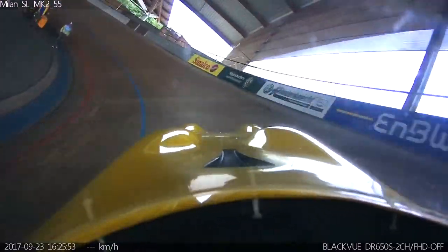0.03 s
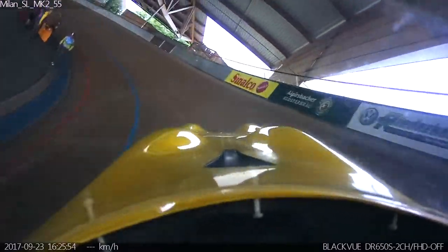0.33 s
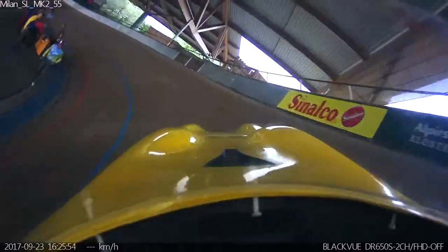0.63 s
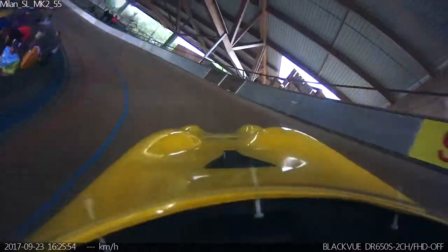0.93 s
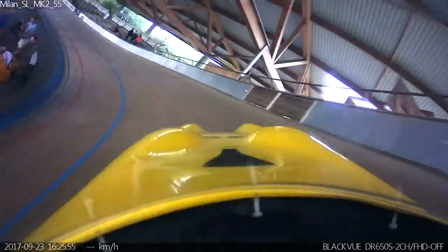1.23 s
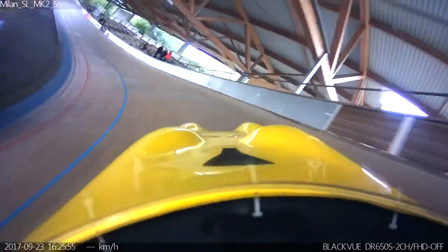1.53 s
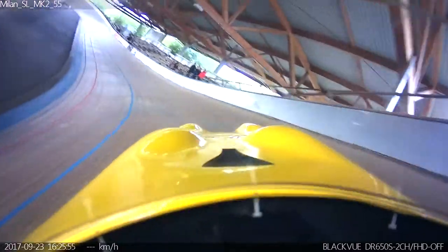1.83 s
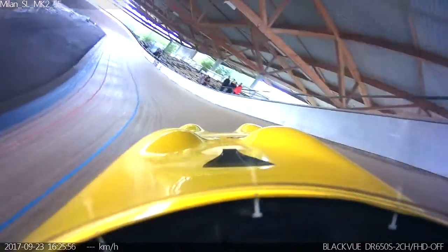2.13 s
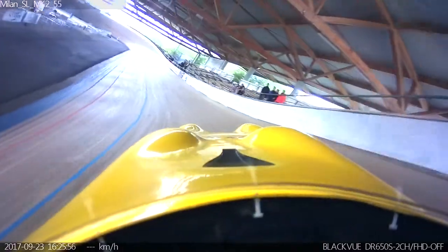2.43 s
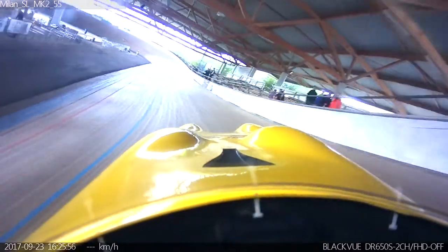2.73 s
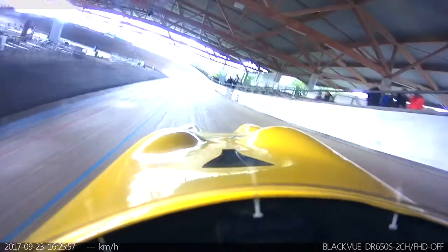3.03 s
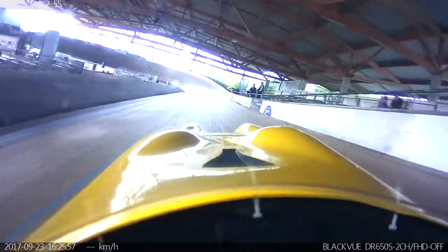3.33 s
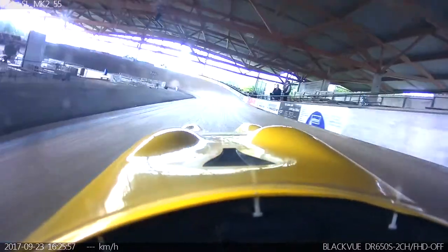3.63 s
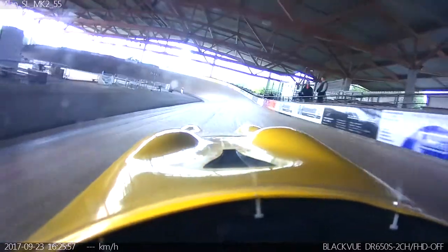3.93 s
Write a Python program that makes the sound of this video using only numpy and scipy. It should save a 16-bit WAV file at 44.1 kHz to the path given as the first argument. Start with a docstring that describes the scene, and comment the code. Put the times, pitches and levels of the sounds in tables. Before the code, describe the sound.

A pedal vehicle rolls fast along a wooden track with a deep, hollow rumble.

```python
"""A velomobile rolls fast along a wooden indoor track, heard from its shell.
Throughout, the body shakes and jolts with a deep rumble and the tyres roar through the hollow shell;
bumps thud, loose parts tick faintly. The cabin booms in the banked turn, fading after 1.4 s.
At 1.5 s and 2.7 s the thin hiss of tyres and air swells into a swish.
From 3.6 s, on the straight, a brighter band grows in the roar."""
import sys
import numpy as np
from scipy import signal
from scipy.fft import rfft, irfft, next_fast_len
from scipy.io import wavfile
from scipy.ndimage import uniform_filter1d, map_coordinates

SR = 44100
rng = np.random.default_rng(int(sys.argv[2]) if len(sys.argv) > 2 else 0)


def store_wav(level_fs):
    """Save 16-bit WAV to argv[1]."""
    pcm = np.round(np.clip(np.atleast_2d(level_fs), -1, 1) * 32767)
    wavfile.write(sys.argv[1], SR, pcm.T.astype(np.int16))


N = 176400

# envelopes of the hiss, its rasp band and its top band: t/s, relative level/dB
HISS_DB = [(0, -52), (.3, -46.5), (.55, -49.5), (.7, -50.5), (.95, -47.5), (1.34, -52), (1.7, -48),
           (2.05, -53), (2.22, -48.5), (2.48, -52.5), (2.7, -53), (3.19, -55), (3.28, -60), (3.42, -48),
           (3.7, -53.5), (3.85, -53), (3.93, -55.5)]
RASP_DB = [(0, -57.5), (.3, -52.5), (.7, -62.5), (.86, -60.5), (.98, -50), (1.15, -58), (1.9, -60),
           (2.2, -54), (2.55, -64), (2.7, -57.5), (2.78, -49.5), (2.92, -48), (3.03, -53.5), (3.28, -62),
           (3.55, -54.5), (3.85, -58.5), (3.92, -67)]
FIZZ_DB = [(0, -68), (1.2, -69.5), (3.5, -69), (3.8, -64.5), (4, -64)]
# air over the shell: start/s, rise/s, release delay from start/s, release time constant/s, level/dB
SWISHES = [(1.464, 0.098, 0.07, 0.033, -37.5), (2.715, 0.05, .27, 0.32, -46.5)]
# impacts of loose parts: t/s, level/dB
TICKS = [(0.118, -31.5), (.444, -35), (0.793, -27), (1.1403, -31.5), (1.8296, -30.5), (1.835, -34.5),
         (2.2383, -35), (2.5767, -29), (3.166, -34.5), (3.186, -28.5), (3.422, -34), (3.5552, -26.5),
         (3.8042, -31.5)]
# modes of a loose part: f/Hz, level/dB, t60/s
TICK_MODES = [(2266, -10.5, 0.015), (2760, -3, 0.0074), (3600, -7.5, 0.0053), (4220, -7, 0.004),
              (5330, -12, 0.0076)]
# track bumps: t/s, level/dB, Gaussian sigma/s
BUMPS = [(0.081, -27.5, 0.01), (0.335, -32.5, 0.025), (0.916, -27, 0.039), (1.241, -27.5, 0.047),
         (1.558, -26.5, 0.035), (1.841, -24.5, 0.012), (1.974, -20.5, 0.013), (2.629, -27.5, 0.015),
         (3.173, -25, .022), (3.432, -28, 0.021), (3.673, -23, 0.0059), (3.836, -24, 0.017),
         (4, -41.5, 0.045)]
# knocks on a shell panel: t/s, level/dB
PANEL_KNOCKS = [(.775, -29.5), (1.95, -30), (3.038, -28), (3.16, -29)]
# envelopes of cabin boom, tyre roar, its bright band and body shake: t/s, relative level/dB
BOOM_DB = [(0, -30.5), (.7, -28), (1.4, -29.5), (2.2, -43), (4, -37.5)]
ROAR_DB = [(0, -27.5), (.9, -27), (1.1, -28.5), (1.4, -28.5), (2.0, -28), (2.45, -30.5), (2.7, -29.5),
           (2.88, -28.5), (3.1, -28.5), (3.3, -29), (3.6, -29.5), (4, -29)]
BRIGHT_DB = [(0, -50.5), (3.55, -51.5), (3.75, -48), (4, -31.5)]
SHAKE_DB = [(.1, -11), (.42, -15), (.6, -11), (.85, -13.5), (1.05, -11), (1.3, -16.5), (1.42, -12),
            (1.72, -16), (1.92, -14), (2.3, -11.5), (2.6, -21.5), (2.75, -15.5), (2.88, -11.5),
            (3.09, -20.5), (3.22, -12), (3.36, -10), (3.59, -14.5), (3.9, -10.5)]
# shell and cabin resonances: f/Hz, width/Hz, level/dB
SHELL_MODES = [(68.8, 9.7, -21), (272.2, 6.7, -35), (535, 18, -39.5), (1366, 41, -48)]
# hard jolts through the suspension: t/s, level/dB
JOLTS = [(0.038, -10.5), (0.572, -5.5), (0.684, -3.5), (0.75, -4.5), (0.955, -6.5), (1.086, -2.5),
         (1.14, -1.5), (1.566, -1.5), (1.834, -5.5), (1.916, 0), (2.686, -5.5), (2.847, -14), (3.215, -3.5),
         (3.575, 0), (3.727, -10), (3.859, -8.5)]
# noise spectra: f/Hz, relative density/dB
HISS_SPECTRUM = [(700, -9), (1500, 8), (2120, 6.5), (2400, 2), (2800, 0.5), (3120, -1.5), (3330, -4.5),
                 (4500, -5.5), (5500, -5.5), (5900, -10.5), (6550, -12), (7300, -35.5)]
SWISH_SPECTRUM = [(900, -5.5), (1400, 5), (1750, -1), (2200, 6.5), (2900, -5.5), (3400, -4.5), (4500, -4.5),
                  (5500, -6), (6200, -13), (7400, -16)]
TICK_SPECTRUM = [(600, -18), (1800, 0.5), (3200, 2.5), (5400, 1), (6200, -9), (7300, -13)]
THUD_SPECTRUM = [(100, -14), (300, 9), (550, -1), (870, -1), (1150, -14), (1500, -26.5), (2200, -35),
                 (6000, -48.5)]
ROAR_SPECTRUM = [(60, -3), (110, 4), (145, 7), (200, 0), (245, 3), (320, -2.5), (420, -3.5), (620, -8.5),
                 (820, -11.5), (1000, -15.5), (1180, -21.5), (1500, -20.5), (1800, -36), (3000, -40.5),
                 (7000, -64)]
RUMBLE_SPECTRUM = [(4, -10), (15, 4.5), (25, 2), (31, 4.5), (39, -5), (52, 1.5), (65, 1.5), (80, -9),
                   (95, -7.5), (115, -22.5), (200, -71.5)]

TIME_S = np.arange(N) / SR
N_FFT = next_fast_len(N + 8192)
FREQ_HZ = np.fft.rfftfreq(N_FFT, 1 / SR)


def amp(db):
    """Decibels to gain."""
    return 10 ** (np.asarray(db) / 20)


def unit(x):
    """Scale to rms 1."""
    return x / np.sqrt(np.mean(x ** 2) + 1e-20)


def curve(rows):
    """Linear interpolation of (t/s, value) rows."""
    return np.interp(TIME_S, *np.transpose(rows))


def wobble(knots_per_s):
    """Smooth random curve, rms near 1."""
    return map_coordinates(rng.standard_normal(2000), [TIME_S * knots_per_s + 3], mode="wrap")


def noise(response):
    """Noise of rms 1, shaped by a response over FREQ_HZ."""
    return unit(irfft(rfft(rng.standard_normal(N_FFT)) * response, N_FFT)[:N])


def coloured(spectrum):
    """Noise with an (f/Hz, level/dB) spectrum."""
    hz, db = np.transpose(spectrum)
    return noise(amp(np.interp(np.log(FREQ_HZ + 1), np.log(hz + 1), db)))


def resonance(hz, width_hz):
    """Noise-driven resonance; two band-passes in series for steep skirts."""
    damping = 2j * FREQ_HZ * width_hz
    return noise((damping / (hz ** 2 - FREQ_HZ ** 2 + damping)) ** 2)


def patchy(x, depth_db=0.78):
    """Random drift of colour from moment to moment; rms 1."""
    spectra = signal.stft(x, nperseg=2048)[2]
    drift = uniform_filter1d(rng.standard_normal(spectra.shape), size=5, axis=0)
    drift = unit(uniform_filter1d(drift, size=6, axis=1))
    return unit(signal.istft(spectra * amp(depth_db * drift), nperseg=2048)[1][:N])


def decay(t, t60_s):
    """Exponential fall, 60 dB in t60_s."""
    return np.exp(-np.log(1000) * t / t60_s)


def strikes(rows, attack_s, t60_s):
    """Envelope of (t/s, level/dB) blows: fast rise, exponential fall."""
    envelope, t = np.zeros(N + SR), TIME_S[:SR // 4]
    shape = (1 - np.exp(-t / attack_s)) * decay(t, t60_s)
    for start_s, db in rows:
        envelope[int(start_s * SR):][:len(t)] += amp(db) * shape
    return envelope[:N]


def hiss():
    """Grainy hiss of tyres and air, with two narrow bands and swishes over the shell."""
    steady = amp(curve(HISS_DB) + 2) * patchy(coloured(HISS_SPECTRUM))
    swell = np.zeros(N)
    for start_s, rise_s, delay_s, release_s, db in SWISHES:
        t = TIME_S - start_s
        swell += amp(db) * np.clip(t / rise_s, 0, 1) * np.exp(-np.maximum(t - delay_s, 0) / release_s)
    swish = swell * patchy(coloured(SWISH_SPECTRUM))
    rasp = amp(curve(RASP_DB)) * resonance(hz=2855, width_hz=260)
    fizz = amp(curve(FIZZ_DB)) * resonance(hz=7020, width_hz=280)
    grain = amp(1.3 * wobble(160) + .5 * wobble(10))
    return grain * (steady + swish + rasp + fizz)


def loose_parts(rebound_db=-6, tail_db=-15, tiny_ticks_per_s=29):
    """Loose parts hit the shell, ring and rebound, over a sprinkle of tiny ticks."""
    snaps, t = np.zeros(N + SR), TIME_S[:SR // 20]
    for start_s, db in TICKS:
        ring = np.zeros(len(t))
        for hz, mode_db, t60_s in TICK_MODES:
            gain = amp(mode_db + rng.normal(0, 1.5))
            detuned_hz = hz * rng.normal(1, .03)
            ring += gain * decay(t, t60_s) * np.sin(2 * np.pi * detuned_hz * t)
        rebound_s = start_s + 0.003 * rng.uniform(.7, 1.3)
        snaps[int(start_s * SR):][:len(t)] += amp(db) * ring
        snaps[int(rebound_s * SR):][:len(t)] += amp(db + rebound_db) * ring
    draws = rng.random((int(tiny_ticks_per_s * N / SR), 2))
    tiny = [(when * N / SR, -38.5 - 0.5 * np.log(max(softness, .05))) for when, softness in draws]
    tails = strikes(list(TICKS) + tiny, attack_s=0.0001, t60_s=0.023)
    return snaps[:N] + amp(tail_db) * tails * coloured(TICK_SPECTRUM)


def bumps():
    """Uneven boards thud softly and knock a shell panel."""
    swell = sum(amp(db) * np.exp(-.5 * ((TIME_S - at_s) / sigma_s) ** 2) for at_s, db, sigma_s in BUMPS)
    panel = strikes(PANEL_KNOCKS, attack_s=0.0039, t60_s=0.083) * resonance(hz=1352, width_hz=250)
    return swell * coloured(THUD_SPECTRUM) + panel


def cabin_boom(hz=178.2, wander_hz=3.5, swing_db=2.5):
    """Wavering cabin tone, strongest in the banked turn."""
    phase = 2 * np.pi * np.cumsum(hz + wander_hz * wobble(14)) / SR
    return amp(curve(BOOM_DB)) * unit(amp(swing_db * wobble(12)) * np.sin(phase))


def tyre_roar():
    """Tyres on uneven boards drive the shell and its resonances with a fluttering roar."""
    drive_db = curve(ROAR_DB)
    flutter = amp(0.81 * wobble(18) + 1.3 * wobble(50))
    roar = amp(drive_db + 5.5) * patchy(coloured(ROAR_SPECTRUM))
    ring = sum(amp(db) * resonance(hz, width_hz) for hz, width_hz, db in SHELL_MODES)
    ring *= amp(.5 * (drive_db - drive_db.mean()))
    bright = amp(curve(BRIGHT_DB)) * resonance(hz=845, width_hz=52)
    return flutter * (roar + ring + bright)


def body_rumble(heave_hz=31.6, rise_s=0.01, highpass_hz=15):
    """The body judders on its suspension; each hard jolt adds one damped heave."""
    judder = unit(amp(-1.2 * wobble(20)) * coloured(RUMBLE_SPECTRUM))
    heaves = np.zeros(N)
    for start_s, db in JOLTS:
        t = np.maximum(TIME_S - start_s, 0)
        envelope = t / rise_s * np.exp(1 - t / rise_s)
        heaves += amp(db) * envelope * np.sin(2 * np.pi * heave_hz * t)
    highpass = signal.butter(1, highpass_hz, "highpass", fs=SR, output="sos")
    return amp(curve(SHAKE_DB) + 0.5) * judder + signal.sosfilt(highpass, heaves)


def scene():
    """Mono sum at the shell."""
    return (body_rumble() + tyre_roar() + cabin_boom() + bumps() + hiss() + loose_parts())[None]


def record(dry, knee_order=14, cutoff_hz=7340):
    """Soft peak limit, then brick-wall low-pass."""
    limited = dry / (1 + np.abs(dry) ** knee_order) ** (1 / knee_order)
    return irfft(rfft(limited, N_FFT) * (FREQ_HZ < cutoff_hz), N_FFT)[..., :N]


dry = scene()
out = record(dry)
store_wav(out)
```